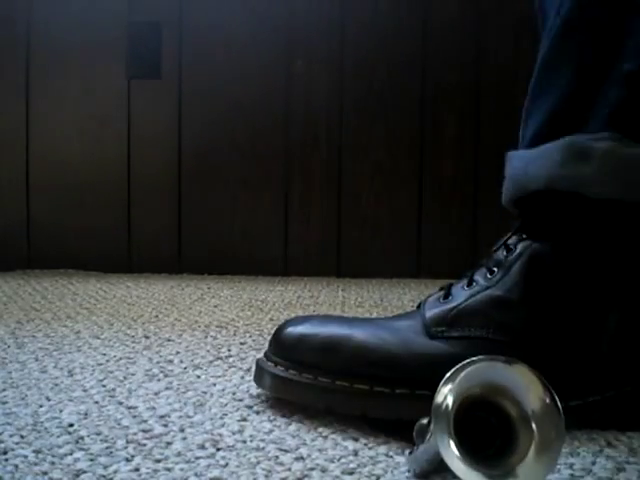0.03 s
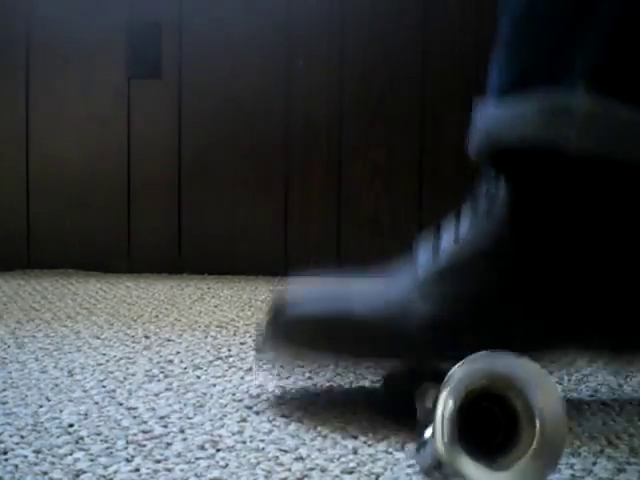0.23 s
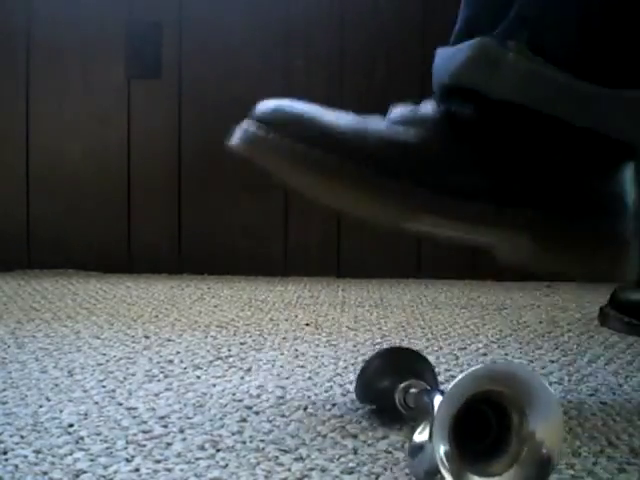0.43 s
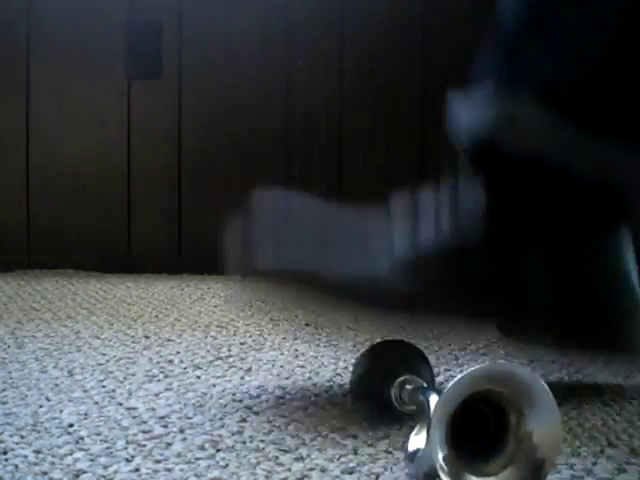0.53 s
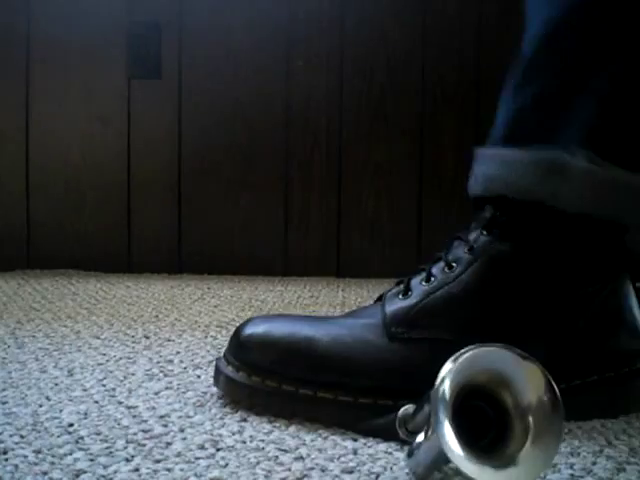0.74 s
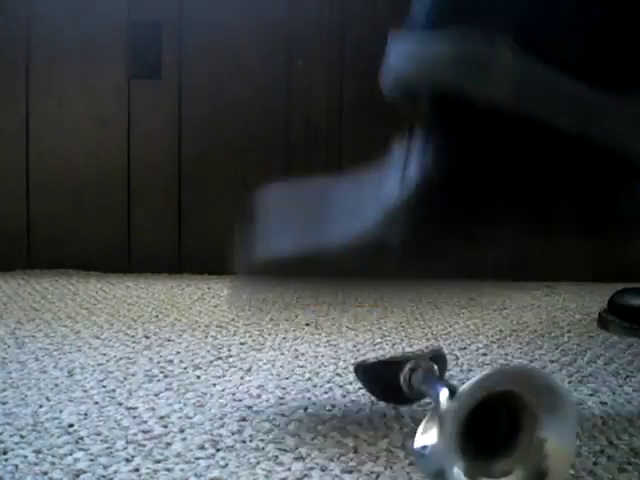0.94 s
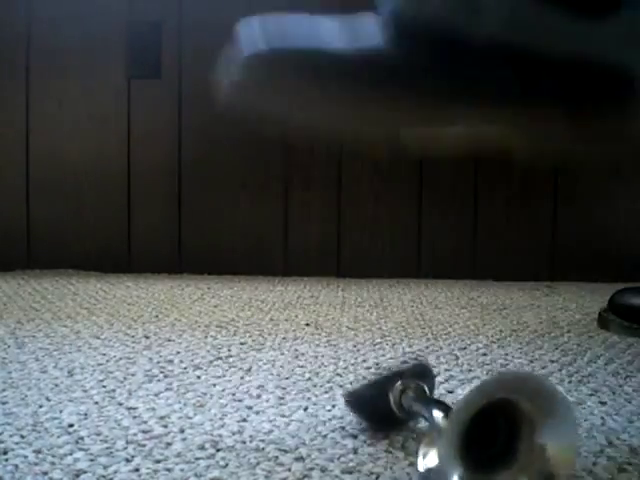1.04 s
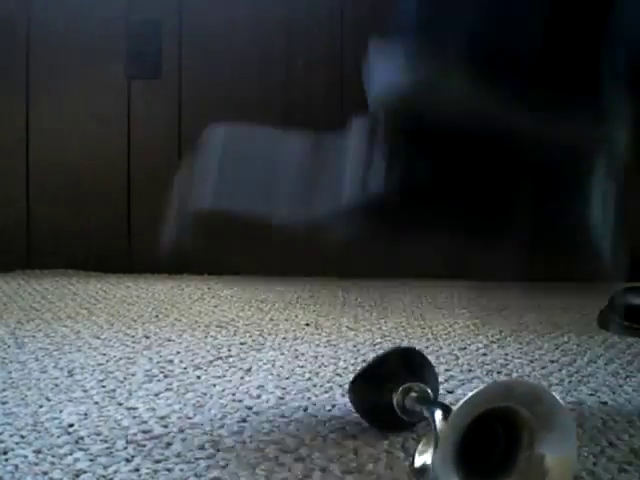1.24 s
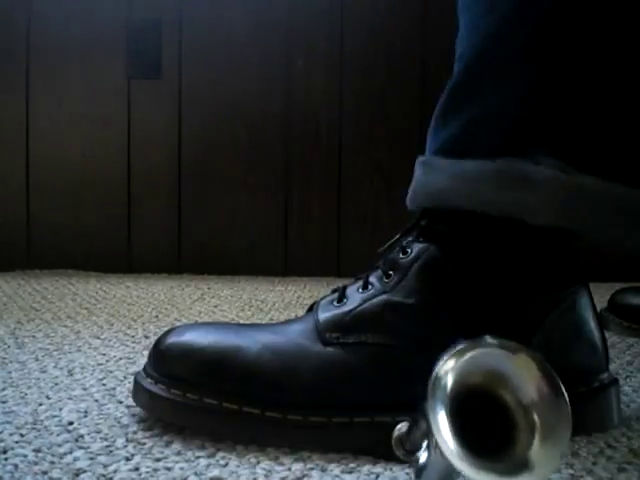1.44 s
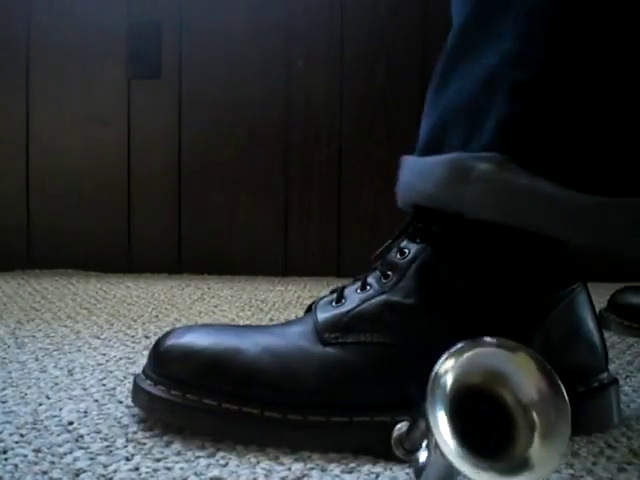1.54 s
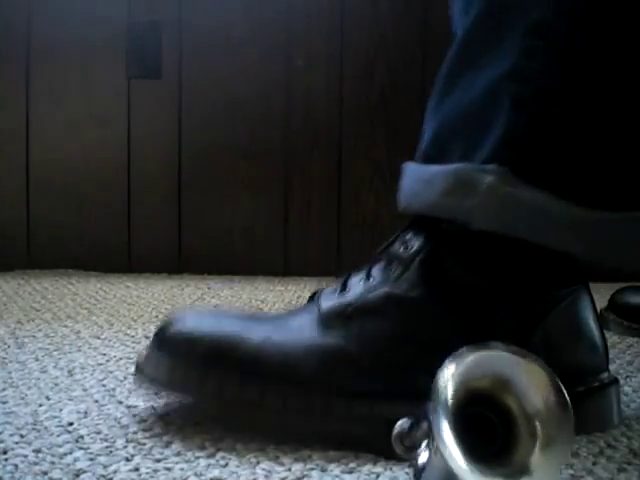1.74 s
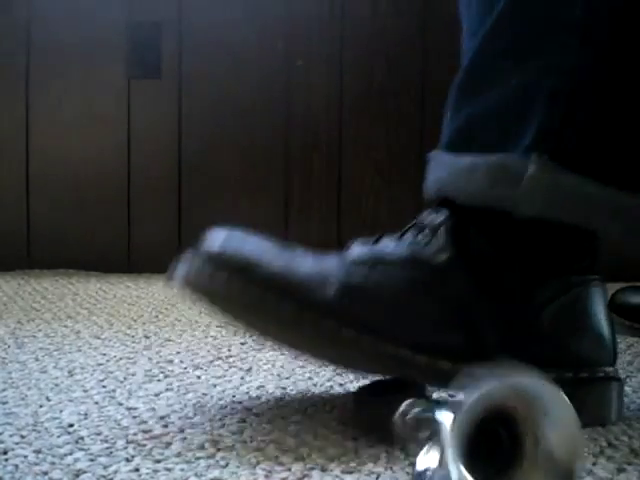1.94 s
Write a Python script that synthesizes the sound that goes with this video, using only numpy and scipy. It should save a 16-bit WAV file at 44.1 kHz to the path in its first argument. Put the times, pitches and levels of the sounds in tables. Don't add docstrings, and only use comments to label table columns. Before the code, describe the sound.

Close up in a small panelled room, a boot works a rubber bulb horn: nasal honks on each lift, knocks and sputtering air on each stamp, faint wheezing afterwards, ending with dull bumps.

```python
import sys
import numpy as np
from scipy import signal
from scipy.fft import rfft, irfft
from scipy.io import wavfile
from scipy.ndimage import uniform_filter1d

SR = 44100
rng = np.random.default_rng(int(sys.argv[2]) if len(sys.argv) > 2 else 0)


def unload_audio(sound):
    columns = np.transpose(np.atleast_2d(sound))
    steps = np.round(np.clip(columns, -1, 1) * 32767)
    wavfile.write(sys.argv[1], SR, steps.astype(np.int16))


def ratio_of_db(decibels):
    return 10 ** (np.asarray(decibels, float) / 20)


N = 88200


def evened(x):
    return x / np.sqrt(np.mean(x ** 2) + 1e-20)


def read(points, hz):
    f, value = np.transpose(points)
    return np.interp(np.log(hz + 1), np.log(f + 1), value)


def add(mix, start_s, sound):
    part = mix[round(start_s * SR):][:len(sound)]
    part += sound[:len(part)]


def noise(colour, size):
    gain = ratio_of_db(read(colour, np.fft.rfftfreq(size, 1 / SR)))
    return evened(irfft(rfft(rng.standard_normal(size)) * gain, size))


def drift(size, span_s):
    span = max(round(span_s * SR), 1)
    smooth = uniform_filter1d(rng.standard_normal(size), span)
    return evened(uniform_filter1d(smooth, span))


def resonate(x, hz, width_hz):
    turn = np.exp(2j * np.pi * hz * np.arange(len(x)) / SR)
    r = np.exp(-np.pi * abs(width_hz) / SR)
    return 2 * (turn * signal.lfilter([1 - r], [1, -r], x / turn)).real


# multiple of reed pitch, level/dB re octave
HARD_TONES = [(1, -10), (2, 0), (3, -12), (4, -17), (5, -9), (6, -22), (7, -24), (8, -22), (9, -23),
              (10, -28), (11, -30), (12, -23), (13, -25), (14, -37), (15, -34), (16, -27), (17, -33),
              (18, -35), (19, -32), (20, -36), (21, -34), (23, -32)]
WAVER, CHATTER_WAVER_TURNS = 0.0071, .025
CHATTER_DB_PER_S, CHATTER_DB, STEADY_CHATTER = 1800, -13, .12
BUZZ_SLOPE, HARD_SHARE, REED_AIR_DB = 0.27, 1.1, -22
SOFT_DB, SOFT_SHARE, SOFT_BEST_DB = 0.1, 0.45, -8
RATTLE_HZ, RATTLE_WIDTH_HZ = 2150, 800


def reed(rows, touch):
    s, *cols = np.transpose(rows)
    t = np.arange(s[0], s[-1], 1 / SR)
    size = len(t)
    hz, swing_db, octave_db, buzz_db = (np.interp(t, s, c) for c in cols)

    buzz_db_per_s = abs(np.gradient(buzz_db)) * SR
    chatter = np.clip(uniform_filter1d(buzz_db_per_s / CHATTER_DB_PER_S, size=130), 0, 1) ** 2
    turn = 2 * np.pi * np.cumsum(hz * (1 + WAVER * drift(size, 0.0012))) / SR
    slap = turn + 2 * np.pi * CHATTER_WAVER_TURNS * chatter * drift(size, 0.00038)

    tone = ratio_of_db(swing_db) * np.sin(turn) + ratio_of_db(octave_db) * np.sin(2 * turn + 1)
    soft = dict(touch)
    soft_gain = ratio_of_db(SOFT_DB - SOFT_SHARE * abs(buzz_db - SOFT_BEST_DB))
    for k, db in HARD_TONES[2:]:
        hard = ratio_of_db(db + HARD_SHARE * buzz_db * (k / 4) ** BUZZ_SLOPE)
        light = soft_gain * (ratio_of_db(soft[k]) if k in soft else 0)
        level = ratio_of_db(octave_db + 1.74 * drift(size, .009)) * np.maximum(hard, light)
        tone += level * np.sin(k * slap + .3 * k * k)

    air = noise(JET, size) * (1 + .4 * np.cos(turn)) * ratio_of_db(octave_db + buzz_db + REED_AIR_DB)
    grit = rng.standard_normal(size + 1)
    bore_grit = evened(np.diff(through_bore(grit)))
    reed_grit = evened(resonate(grit[1:], RATTLE_HZ, RATTLE_WIDTH_HZ))
    rattle_gain = (chatter + STEADY_CHATTER) * ratio_of_db(octave_db + 0.35 * buzz_db + CHATTER_DB)
    rattle = (bore_grit + reed_grit) * rattle_gain
    fade = np.clip(np.minimum(s[-1] - t, t - s[0]) / .004, 0, 1)
    return s[0], fade * (air + rattle - np.sqrt(2) * tone)


# t/s, reed f/Hz, reed swing level/dB, bell octave level/dB, buzz level/dB
LONG_HONK = [(.232, 604.8, -48, -48.5, -45.5), (.241, 602.6, -21, -40, -28), (.2475, 627.8, -8, -12, -18),
             (.253, 582, -15, -6.5, 1), (.262, 575.3, -17, -8, -0.5), (.302, 572, -15.5, -8.5, 0),
             (.315, 572, -24, -9.5, -16), (.342, 571.7, -30.5, -15.5, -21.5), (.372, 570, -44, -37, -22)]
SQUAWK = [(.612, 570.4, -27.5, -67.5, -30.5), (0.622, 603, -22, -47.5, -19.5),
          (0.631, 588.7, -12, -22.5, -33.5), (.645, 595, -20, -35, -18.5), (0.655, 615.8, -8.5, -11.5, -32),
          (0.658, 610, -13, -10, -10), (0.661, 541, -25, -17, 5), (0.665, 528, -27, -18, 5),
          (0.676, 515, -36, -40, -2)]
SHORT_HONK = [(.886, 619.7, -53, -79, -37.5), (0.899, 620.3, -24, -41, -15), (.907, 620.4, -6, -8, 1.5),
              (0.913, 565.7, -21, -6, -8), (0.931, 576.6, -19.5, -8, -8.5), (0.936, 575.3, -24, -14.5, -20),
              (0.944, 570, -20.5, -8, -15), (0.963, 571, -29.5, -17, -30), (0.989, 575, -54, -36, -17)]
# multiple of reed pitch, level/dB re octave
SOFT_TONES = [(1, -12), (2, 0), (3, -28), (4, -15), (5, -21), (6, -21), (7, -23), (8, -29), (9, -22),
              (10, -31), (11, -30)]


def honks(near):
    for rows in [LONG_HONK, SQUAWK, SHORT_HONK]:
        add(near, *reed(rows, SOFT_TONES))


# t/s, reed swing level/dB, bell octave level/dB, buzz level/dB
AFTERSONG = [
    [(.36, -48, -48, -8), (.378, -43, -38, -12), (.395, -46, -34, -16), (.428, -54, -37, -14),
     (.448, -53, -50, -8), (.465, -54, -41, -14), (.515, -62, -44, -12), (.53, -64, -53, -8),
     (.57, -70, -52, -8)],
    [(.985, -55, -45, -14), (1.01, -43, -43, -14), (1.03, -43, -40, -18), (1.045, -50, -39, -20),
     (1.074, -60, -40, -22), (1.088, -60, -56, -12), (1.105, -59, -43, -26), (1.148, -67, -44, -26),
     (1.17, -66, -70, -19)],
]
# multiple of reed pitch, level/dB re octave
FAINT_TONES = [(3, -20), (4, -21), (5, -12), (6, -17), (7, -16), (8, -24), (9, -15), (10, -27), (11, -26)]
REST_HZ = 573


def aftersong(near):
    for rows in AFTERSONG:
        add(near, *reed(np.insert(np.array(rows), 1, REST_HZ, axis=1), FAINT_TONES))


# f/Hz, width/Hz, level/dB
BORE = [(290, 100, -8), (581, 84, -4.5), (1200, 94, -5.5), (2063, 180, -5.5), (3105, 350, -5),
        (5130, 540, -8)]


def through_bore(x):
    return sum((-1) ** k * ratio_of_db(db) * resonate(x, hz, w) for k, (hz, w, db) in enumerate(BORE))


# t/s, level/dB
PUFFS = [
    [(.588, -47), (.594, -22), (.604, -13), (.647, -14.5), (.655, -27), (.664, -31), (.668, -50),
     (.676, -58)],
    [(1.299, -42), (1.308, -42), (1.313, -23.5), (1.321, -13.5), (1.351, -16), (1.356, -28.5),
     (1.366, -52.5), (1.4, -49)],
]
# f/Hz, level/dB per Hz
JET = [(880, -51), (1500, -22.5), (2080, -12), (2470, -22.5), (3050, -11.5), (4970, -3), (8260, -6.5),
       (12400, 0.5), (17000, -6)]
SPUTTER_DB, BORE_DB, WHISTLE_DB = 2.5, -11.5, 8.5


def puff(rows):
    s, flow_db = np.transpose(rows)
    t = np.arange(s[0], s[-1], 1 / SR)
    size = len(t)
    flow_db = np.interp(t, s, flow_db)
    whistle = ratio_of_db(flow_db + WHISTLE_DB) * evened(resonate(noise(JET, size), 14000, 6000))
    bore = ratio_of_db(BORE_DB) * evened(through_bore(rng.standard_normal(size)))
    jet = noise(JET, size) + whistle + bore
    return s[0], jet * ratio_of_db(flow_db + SPUTTER_DB * drift(size, .0005))


# t/s, length/s, level/dB, f/Hz
SQUASH = [(.585, .05, -32, 130), (.588, .03, -36, 330), (1.31, .035, -27, 250), (1.3, .012, -36, 500),
          (1.365, .03, -44, 200), (.9, .03, -42, 90), (.25, .028, -39, 50), (.288, .028, -38, 90),
          (.657, .01, -19, 4800), (.688, .05, -47, 2000), (.69, .18, -51, 2500), (.69, .035, -49, 4600),
          (.57, .1, -43, 70), (1.3, .05, -36, 140), (1.3, .06, -40, 1100), (.304, .014, -24, 2300),
          (.17, .08, -50, 400), (1.74, .2, -50, 300)]


def squash(start_s, length_s, db, hz):
    t = np.arange(0, length_s, 1 / SR)
    body = rng.standard_normal(SR // 4)
    for _ in range(2):
        body = resonate(body, hz, 1.4 * hz)
    body = evened(body[-len(t):])
    return start_s, ratio_of_db(db) * body * np.sin(np.pi * (t / length_s) ** 0.56)


# t/s, peak level/dB, start f/Hz, end f/Hz, t60/s
KNOCKS = [(.174, -19.5, 960, 666, 0.01), (.5775, -15, 1200, 950, 0.014), (1.2985, -19.5, 1000, 450, 0.013),
          (1.314, -15.5, 580, 585.6, 0.073), (1.8165, -11, 743, 640, 0.011), (1.828, -36, 575, 585, .12),
          (1.322, -17, 300, 280, .04), (.601, -22, 350, 300, .02), (.578, -36, 4900, 4850, .04),
          (.659, -14, 3200, 3150, .04), (.659, -15, 2400, 2250, .03), (.668, -30, 1100, 1080, .08),
          (.692, -34, 1230, 1220, .1), (.682, -38, 600, 598, .4), (1.817, -24, 2030, 1970, 0.012),
          (1.817, -30, 3850, 3790, .02), (1.356, -30, 620, 598, 0.046), (1.946, -33.5, 575, 583, 0.16),
          (1.9845, -9, 860, 540, 0.022), (1.989, -13, 260, 480, 0.04)]
SAG_S, STIFFEN_S = .0012, .012


def knock(start_s, db, from_hz, to_hz, t60_s):
    t = np.arange(0, .15, 1 / SR)
    glide_s = SAG_S if to_hz < from_hz else STIFFEN_S
    hz = to_hz + (from_hz - to_hz) * np.exp(-t / glide_s)
    level = ratio_of_db(db - 60 * t / t60_s) * np.minimum(t / 0.00068, 1)
    return start_s, level * np.sin(2 * np.pi * np.cumsum(hz) / SR)


# t/s, peak level/dB, f/Hz
TICKS = [
    (.5775, -14, 3500),
    (1.2985, -14, 4500),
    (1.3265, -9, 6000),
    (1.3393, -9, 6000),
    (1.4945, -24, 8500),
    (1.697, -41.5, 5970),
    (1.686, -35.5, 940),
]


def tick(start_s, db, hz):
    t = np.arange(0, .008, 1 / SR)
    snap = (t == 0) + 0.17 * rng.standard_normal(len(t)) * np.exp(-t / 0.0002)
    snap = resonate(resonate(snap, hz, 1.3 * hz), hz, 1.3 * hz)
    return start_s, ratio_of_db(db) * snap / abs(snap).max()


# f/Hz, t60/s
ROOM_T60 = [(300, 0.41), (1200, 0.33), (4000, 0.45), (14000, 0.06)]
ROOM_DB = -21
ECHO_S, ECHO_RISE_S, ECHO_DB = .028, .01, 6


def room(x):
    hz, t, z = signal.stft(rng.standard_normal(SR), SR, nperseg=256)
    decay = ratio_of_db(-60 * t / read(ROOM_T60, hz)[:, None])
    tail = signal.istft(z * decay, SR, nperseg=256)[1]
    tail_s = np.arange(len(tail)) / SR
    tail *= np.minimum(tail_s / 0.0077, 1)
    tail *= ratio_of_db(ECHO_DB * np.clip((tail_s - ECHO_S) / ECHO_RISE_S, 0, 1))
    x = signal.sosfilt(signal.butter(1, 1400, "high", fs=SR, output="sos"), x)
    return signal.fftconvolve(x, tail / np.linalg.norm(tail))[:N]


FADING_DB, FADING_T60_S = -45.5, 0.96


def fading():
    level = ratio_of_db(FADING_DB - 60 * np.arange(N) / SR / FADING_T60_S)
    return level * evened(through_bore(noise(LEAK_COLOUR, N)))


# t/s, level/dB
LEAK = [(0, -75), (.12, -63.5), (0.202, -51), (0.242, -37), (.36, -56), (.55, -50), (.68, -62),
        (.86, -61.5), (0.896, -42), (1.0, -54.5), (1.28, -51), (1.459, -58.5), (1.52, -63), (1.73, -67),
        (1.758, -50), (1.88, -51), (1.95, -47), (2.0, -49)]
# f/Hz, level/dB per Hz
LEAK_COLOUR = [(240, -31), (400, -7.5), (1070, -14), (1190, -2), (1370, -14), (3120, -9), (8060, -14.5),
               (12200, -12), (17500, -23)]
# f/Hz, level/dB per Hz
ROOM_TONE = [(12, -37.5), (20, -0.5), (141, -2), (249, -9.5), (360, -10), (797, -19), (1220, -9),
             (1660, -25), (17500, -55)]
LEAK_DB, HUM_DB, ROOM_TONE_DB = 5, -59.5, -49


def background():
    flow_db = np.interp(np.arange(N) / SR, *np.transpose(LEAK)) + 1.06 * drift(N, 0.015)
    leak = ratio_of_db(flow_db + LEAK_DB) * noise(LEAK_COLOUR, N)
    hum = ratio_of_db(HUM_DB + 2 * drift(N, .05)) * evened(through_bore(rng.standard_normal(N)))
    tone = ratio_of_db(ROOM_TONE_DB + 0.99 * drift(N, 0.031)) * noise(ROOM_TONE, N)
    return leak + hum + tone


DUCK_FROM_DB, DUCK_SHARE, DUCK_BACK_DB_PER_S = -35.5, 0.32, 49.5


def ducking(near):
    power_db = 10 * np.log10(abs(uniform_filter1d(near ** 2, size=300)) + 1e-12)
    back_db = np.arange(N) * DUCK_BACK_DB_PER_S / SR
    held_db = np.maximum.accumulate(power_db + back_db) - back_db
    over_db = np.maximum(held_db - DUCK_FROM_DB, 0)
    return ratio_of_db(-DUCK_SHARE * uniform_filter1d(over_db, size=200))


def scene():
    near = np.zeros(N)
    honks(near)
    aftersong(near)
    for rows in PUFFS:
        add(near, *puff(rows))
    for voice, table in ((squash, SQUASH), (knock, KNOCKS), (tick, TICKS)):
        for row in table:
            add(near, *voice(*row))
    behind = ratio_of_db(ROOM_DB) * room(near) + background() + fading()
    return (near + ducking(near) * behind)[None]


def top_cut(x):
    return signal.sosfilt(signal.butter(12, 18450, fs=SR, output="sos"), x)


def record(dry):
    limit, edge_hz = 1.7, 17750
    x = limit * np.tanh(dry / limit)
    lowpass = signal.firwin(255, edge_hz, window=("kaiser", 9), fs=SR)
    x = signal.oaconvolve(x, lowpass[None], "same")
    return top_cut(np.clip(x, -1, 1))


dry = scene()
out = record(dry)
unload_audio(out)
```